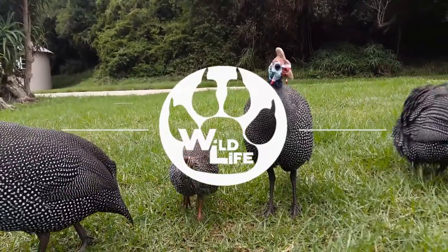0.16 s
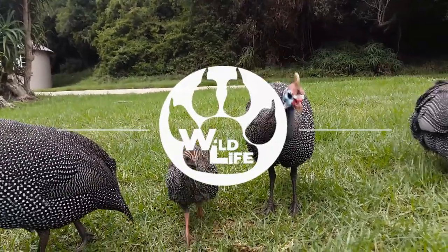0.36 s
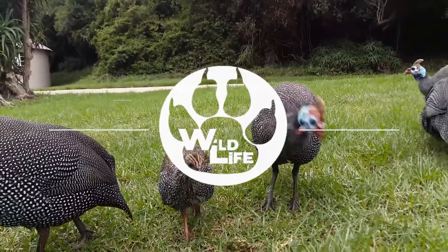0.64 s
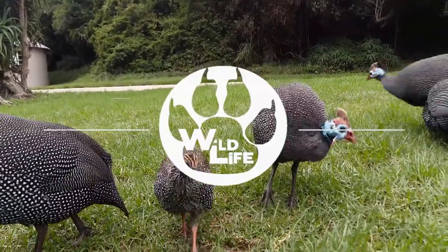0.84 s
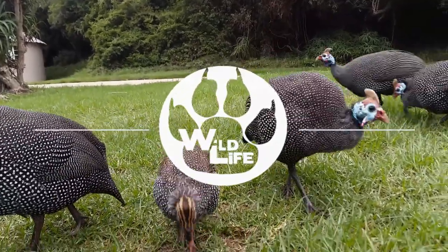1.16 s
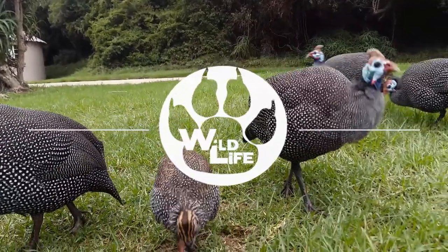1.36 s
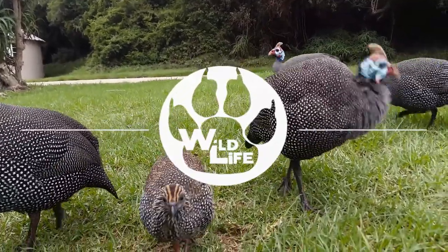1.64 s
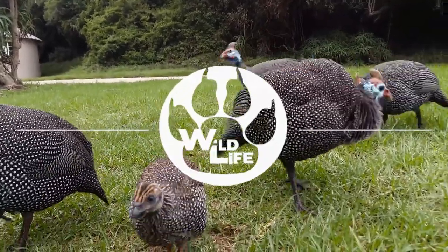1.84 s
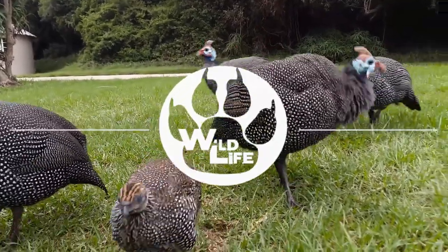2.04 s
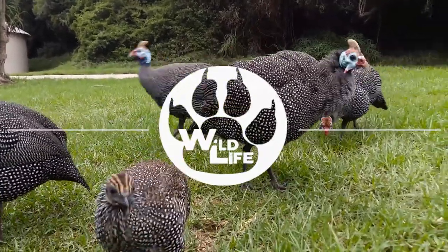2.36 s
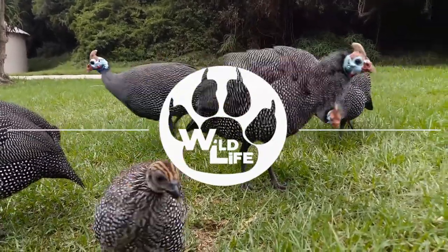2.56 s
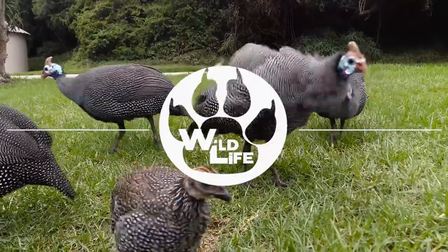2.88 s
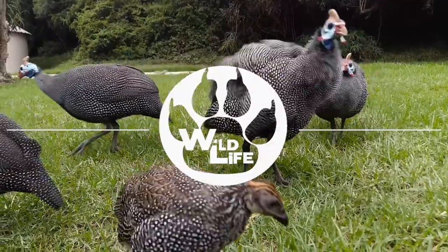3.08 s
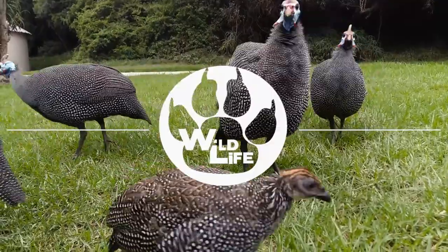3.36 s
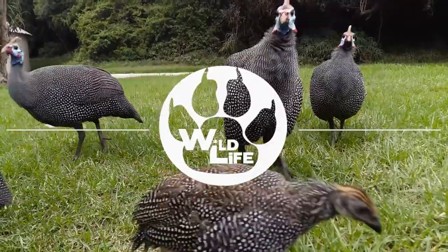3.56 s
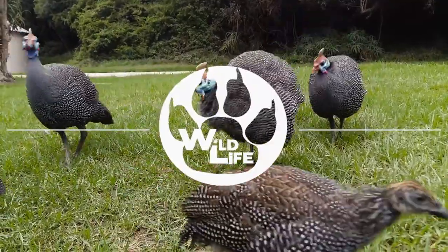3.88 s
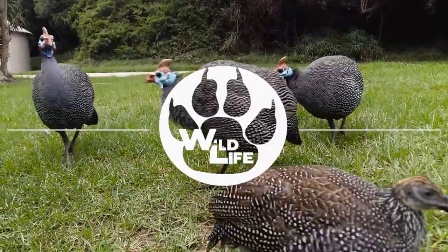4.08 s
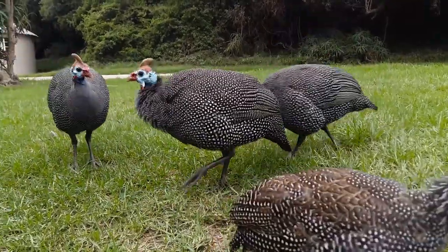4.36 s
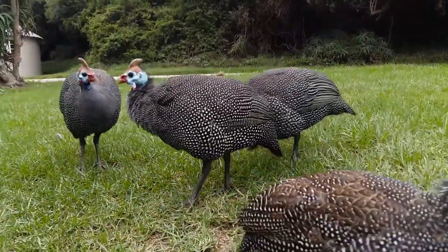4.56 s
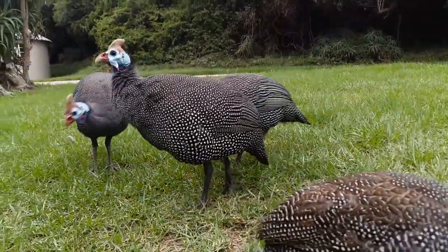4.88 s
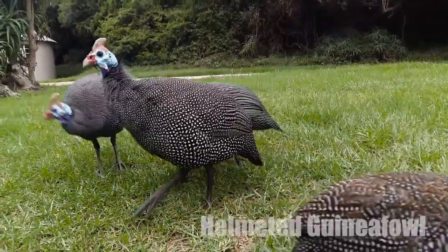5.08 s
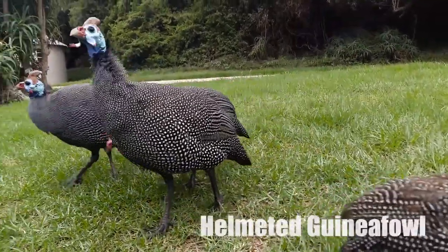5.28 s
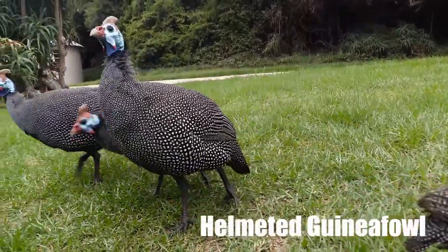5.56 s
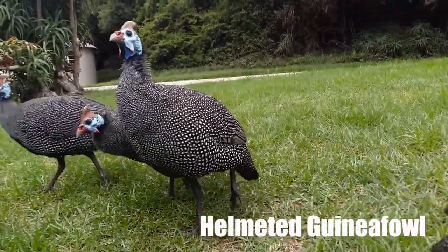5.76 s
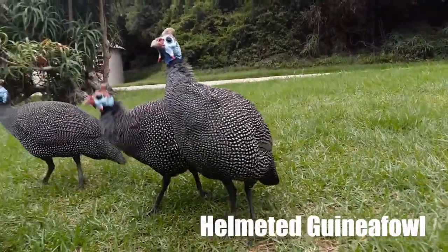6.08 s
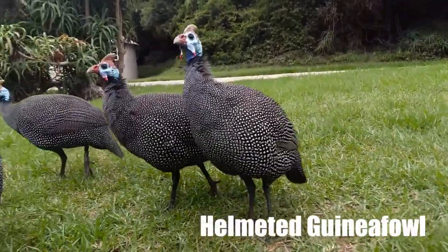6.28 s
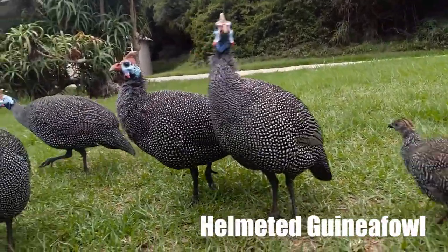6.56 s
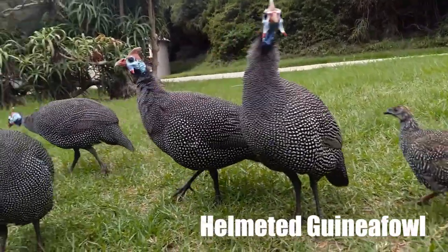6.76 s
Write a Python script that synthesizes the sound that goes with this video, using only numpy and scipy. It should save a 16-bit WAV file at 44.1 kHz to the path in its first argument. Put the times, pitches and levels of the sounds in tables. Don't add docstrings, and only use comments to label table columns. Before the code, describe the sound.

Low wind rumble and soft thumping buffets open the scene on a grassy lawn. Foraging guineafowl give brief chirps, falling whistles and thin chick warbles among grass snaps and dull footfalls. A bird shakes its feathers near three seconds, then a forced cry breaks into a sharp, very loud cluck at four. Sparser peeps, whistles and pecks follow. Close small stereo microphone, outdoors, faint echoes.

```python
import sys
import numpy as np
from scipy import signal
from scipy.io import wavfile
from scipy.ndimage import uniform_filter1d

SR = 44100
rng = np.random.default_rng(int(sys.argv[2]) if len(sys.argv) > 2 else 0)


def generate_wav(signal):
    frames = np.transpose(np.atleast_2d(signal))
    scaled = np.clip(frames, -1, 1) * 32767
    pcm = np.round(scaled).astype(np.int16)
    wavfile.write(sys.argv[1], SR, pcm)


def amplitude_ratio(level_db):
    exponent = np.asarray(level_db, float) / 20
    return 10 ** exponent


N = 305172


def evened(x):
    return x / np.sqrt(np.mean(x ** 2) + 1e-20)


def read(points, hz):
    f, *values = np.transpose(points)
    return np.array([np.interp(np.log(hz + 1), np.log(f + 1), v) for v in values])


def add(mix, s, sound):
    part = mix[..., max(round(s * SR), 0):][..., :sound.shape[-1]]
    part += sound[..., :part.shape[-1]]


def band(x, lo_hz, hi_hz, order=2):
    return signal.sosfilt(signal.butter(order, [lo_hz, hi_hz], "band", fs=SR, output="sos"), x)


def smooth(x, first, second):
    return uniform_filter1d(uniform_filter1d(x, first, mode="nearest"), second, mode="nearest")


# freq_hz, left_db, right_db
AIR = [(25.3, -77, -82), (45, -65.5, -66), (70, -67, -65), (141, -66, -65.5), (269, -71, -70.5),
       (590, -81.5, -80.5), (940, -84.5, -82.5), (1660, -87, -86), (2680, -91.5, -82.5), (3100, -92.5, -98),
       (4000, -96.5, -99.9), (4650, -97, -104.3), (5760, -101.4, -102.6), (14300, -109.2, -107.9)]
# freq_hz, left_db, right_db
RUSTLE = [(25, -68.3, -68.4), (45, -70.9, -71.0), (70, -64.3, -63.9), (130, -61.4, -60.2),
          (300, -68.7, -68.1), (600, -76.3, -74.6), (1000, -79.7, -77.6), (1700, -82.1, -75.2),
          (2500, -81.4, -69.1), (3200, -85.4, -84.3), (3800, -84.8, -92.1), (4700, -82.0, -98.3),
          (6000, -90.4, -94.4), (14000, -105.1, -104.1)]
# time_s, stir_db, wind_db
STIR = [(0.0, -82.5, -53.5), (0.56, -85.5, -52.5), (0.87, -83, -53), (1.73, -84.5, -55.5),
        (2.21, -79.5, -52), (2.511, -91.5, -56), (2.73, -75.5, -53), (2.89, -71, -47.5), (3.02, -74, -55),
        (3.085, -80.5, -54.5), (3.969, -80.5, -54), (4.59, -84.5, -54.5), (5.45, -77.5, -50.5),
        (5.95, -83, -53), (6.32, -78, -53.5), (6.43, -76, -52.5), (6.55, -79, -53.5), (6.92, -84, -50.5)]
# freq_hz, likeness (0-1)
LIKENESS = [(60, 0.77), (110, 0.66), (210, 1), (390, 0.45), (900, 0.19), (2500, 0.023)]


def lawn():
    frames, hz = N // 256 + 5, np.fft.rfftfreq(1024, 1 / SR)
    s, stir_db, wind_db = np.transpose(STIR)
    t = np.arange(frames) * 256 / SR
    a, b, c, d, patches = rng.standard_normal((frames, 513, 5)).T
    patches = evened(uniform_filter1d(uniform_filter1d(patches, 14, 0), 9, 1))
    lumps, flicker = (evened(uniform_filter1d(v, size=3, axis=1))[:, None]
                      for v in rng.standard_normal((frames, 2, 2)).T)
    low = 1 / (1 + (hz[:, None] / 450) ** 2)
    wind = low * (np.interp(t, s, wind_db) + 56 + 1.7 * lumps)
    air = amplitude_ratio(read(AIR, hz)[:, :, None] + wind)
    stir = np.sqrt(np.maximum(amplitude_ratio(2 * np.interp(t, s, stir_db + 72.5)) - .06, 0))
    treble_loss = 1 + (hz[:, None] / 9000) ** 2
    rustle = amplitude_ratio(read(RUSTLE, hz)[:, :, None] + 1.2 * flicker + patches)
    rustle = rustle * stir * (1 - low) / treble_loss
    same = np.clip(read(LIKENESS, hz)[0], -1, 1)[:, None]
    left = a + 1j * b
    right = same * left + np.sqrt(1 - same ** 2) * (c + 1j * d)
    z = np.array([left, right]) * np.hypot(air, rustle) * amplitude_ratio(7.0 + 1.37 * patches)
    return signal.istft(z, nperseg=1024, noverlap=768)[1][:, :N]


def whistle(arc, level_db, lead, octave, ports_db, strain=1):
    t = np.arange(len(arc)) / SR
    wander = rng.standard_normal(SR // 2)
    waver = evened(uniform_filter1d(uniform_filter1d(wander, size=100), size=60))[:len(t)]
    top_db = level_db.max()
    faint = np.clip((-40 - top_db) / 20, 0, 1.5)
    level = amplitude_ratio(level_db + ports_db + waver[::-1] * (.25 + 5 * faint))
    forced = np.clip(2 * (np.hypot(*level) / strain - 1), 0, 1)
    break_hz, span_hz = 3880, 199.6
    near = (arc - break_hz) / span_hz
    arc = arc + forced * span_hz * near * np.exp(-near ** 2 / 2)
    flutter = 1 - .9 * forced * np.exp(-(near / .35) ** 2)
    unsteady = 1 + (.0012 + .011 * faint) * waver
    turn = 2 * np.pi * np.cumsum(arc * unsteady) / SR + np.array([[lead], [0]])
    octave_db, share = octave
    octave_db = top_db + octave_db + share * (level_db - top_db) + 2.0 * waver + np.array([[0], [-9]])
    tone = level * np.sin(turn) * flutter + amplitude_ratio(octave_db) * np.sin(2 * turn)
    return np.sqrt(2) * tone * signal.windows.tukey(len(t), .08)


# freq_hz, left_db, right_db
PORTS = [(1600, -8.5, -5), (2350, -9, -1), (2700, -2.5, 3), (2950, 1.5, -2.5), (3250, -2.5, 0.5),
         (3700, 0, -13), (4400, 0.5, -24), (5100, -5.5, -20)]


def cavities(arc):
    return read(PORTS, arc)


# start_s, length_s, top_hz, end_hz, level_db
CHIRPS = [
    (0.047, 0.028, 2910, 2650, -57),
    (1.685, 0.032, 4360, 3800, -52.5),
    (5.045, 0.038, 4435, 3700, -43),
]


def chirps():
    out = np.zeros((2, N))
    attack_s, release_s, swell_s, swell_db = .0089, .005, 0.03, 12.6
    for start, length, top_hz, end_hz, db in CHIRPS:
        t = np.arange(0, length, 1 / SR)
        top = length - np.sqrt(abs(top_hz - end_hz) / 2.2) / 1000
        up, down = np.clip(1 - t / top, 0, 1), np.clip((t - top) / (length - top), 0, 1)
        arc = top_hz * (1 - 0.25 * up ** 2) - (top_hz - end_hz) * down ** 2.1
        edges = np.clip(t / attack_s, .03, 1) * np.clip((length - t) / release_s, .03, 1)
        swell = swell_db * np.clip((length - release_s - t) / swell_s, 0, 1)
        level_db = db - swell + 20 * np.log10(edges)
        add(out, start, whistle(arc, level_db, 1.4, (-44, .5), cavities(arc)))
    return out


# time_s, peak_db, pitch_hz, length_s
LEFT_BUFFETS = [(0.146, -35.7, 87, 0.021), (0.174, -29.3, 88, 0.017), (0.219, -36.8, 55, 0.013),
                (0.308, -33.8, 95, 0.011), (0.362, -28.3, 83, 0.027), (0.394, -33.6, 79, 0.014),
                (0.427, -36.2, 200, 0.008), (0.463, -33.6, 71, 0.008), (0.58, -29.1, 95, 0.017),
                (0.606, -34.8, 68, 0.01), (0.648, -34.1, 148, 0.008), (0.681, -22.8, 94, 0.011),
                (0.723, -37.1, 72, 0.017), (0.875, -33.1, 98, 0.016), (0.9, -35.6, 61, 0.008),
                (1.161, -36.0, 57, 0.008), (2.045, -37.8, 116, 0.011), (2.167, -37.0, 106, 0.012),
                (3.062, -33, 140, 0.007), (3.38, -37.3, 74, 0.008), (3.723, -30.1, 79, 0.02),
                (3.858, -37.5, 98, 0.008), (3.896, -27.5, 104, 0.021), (6.342, -37.3, 109, 0.012),
                (6.373, -35.0, 82, 0.018), (6.519, -34.3, 78, 0.033), (6.584, -37.8, 66, 0.008),
                (6.706, -28.7, 122, 0.008), (6.728, -35.9, 72, 0.008), (6.752, -28.4, 92, 0.018)]
# time_s, peak_db, pitch_hz, length_s
RIGHT_BUFFETS = [(0.446, -31.5, 256, 0.008), (0.472, -34.1, 98, 0.008), (3.061, -32, 150, 0.007),
                 (4.684, -37.7, 146, 0.011), (5.363, -33.3, 132, 0.01), (5.48, -33.1, 116, 0.01),
                 (5.57, -35.7, 146, 0.021), (5.695, -35.2, 154, 0.01), (5.745, -37.8, 68, 0.008),
                 (5.788, -37.1, 116, 0.008), (6.368, -37.3, 119, 0.011), (6.396, -36.8, 78, 0.008)]


def buffets():
    out = np.zeros((2, N))
    for port, rows in enumerate([LEFT_BUFFETS, RIGHT_BUFFETS]):
        for (s, db, hz, length), phase in zip(rows, rng.random(len(rows))):
            t = np.arange(-2 * length, 2 * length, 1 / SR)
            push = np.exp(-2.8 * (t / length) ** 2) * np.cos(2 * np.pi * (hz * t + phase))
            add(out[port], s - 2 * length, amplitude_ratio(db) * push)
    return out


def grown_call(rows, lead, octave):
    s, *curves = np.transpose(rows)
    t = np.arange(s[0], s[-1], 1 / SR)
    hz, db, pan_db = (np.interp(t, s, v) for v in curves)
    hz = uniform_filter1d(hz, 260, mode="nearest")
    db = uniform_filter1d(db, 90, mode="nearest")
    arched = hz.max() > 4500 and rows[0][1] < 2320
    db = db + 4 * arched * np.cos(2 * np.pi * (hz - 3500) * 0.00232)
    ports_db = 10 * np.log10(2 / (1 + amplitude_ratio(np.array([[-2], [2]]) * pan_db)))
    return whistle(hz, db, lead, octave, ports_db, strain=0.058)


# time_s, pitch_hz, level_db, left_over_right_db
PEEPS = [
    [(0.362, 2400, -62, -11), (0.368, 2410, -51, -15), (0.381, 2420, -44.1, -19), (0.399, 2370, -42, -15.5),
     (0.411, 2330, -44.3, -14), (0.421, 2260, -51, -13), (0.426, 2150, -62, -22)],
    [(2.427, 2770, -59, -12), (2.435, 2863, -48, -7), (2.465, 2883, -38.3, -8.5), (2.48, 2818, -34, -12),
     (2.501, 2645, -32.5, -15), (2.515, 2520, -39.3, -21), (2.522, 2500, -56, -23)],
    [(3.125, 2350, -57, -11), (3.129, 2340, -47, -14), (3.137, 2368, -40.5, -14),
     (3.156, 2350, -38.5, -14.5), (3.17, 2320, -43.5, -16), (3.178, 2250, -49, -16), (3.183, 2270, -61, -8)],
    [(5.393, 2180, -63, -13), (5.401, 2350, -41, -16), (5.41, 2390, -36.5, -16.5), (5.428, 2370, -37, -16),
     (5.444, 2300, -46.5, -17), (5.452, 2260, -55.5, -19), (5.454, 2160, -59.9, -21)],
    [(6.252, 2440, -50, -17), (6.26, 2626, -42.5, -13), (6.27, 2655, -36.7, -11), (6.284, 2525, -35, -19),
     (6.294, 2490, -39.5, -31), (6.305, 2406, -46, -20), (6.322, 2290, -62, -9)],
]
PEEP_OCTAVES_DB = [-29.5, -34.5, -25, -32.5, -37.5]


def peeps():
    out = np.zeros((2, N))
    left_leads_rad = [2, -1.0, 4.5, -2, 0.3]
    for rows, lead, octave_db in zip(PEEPS, left_leads_rad, PEEP_OCTAVES_DB):
        add(out, rows[0][0], grown_call(rows, lead, (octave_db, 0.83)))
    return out


# time_s, left_peak_db, right_peak_db, treble_db
SNAPS = [(0.413, -54, -40, -12), (1.1504, -49, -36.5, -13.5), (1.1524, -61, -32.5, -24),
         (1.662, -49.6, -49.5, -15), (1.856, -47, -42, -39), (2.717, -49, -53, -4),
         (2.802, -37, -48, -15.5), (2.8205, -38, -36, -12), (2.95, -50.5, -42, -8.5),
         (2.991, -46, -42.5, -14), (3.0577, -42.5, -35.5, -7.5), (3.063, -42, -50.5, 0),
         (4.832, -55, -55.5, -22.5), (4.956, -53.5, -43.5, -25.5), (5.58, -59, -46, -16),
         (5.637, -52, -37, -14), (5.6911, -65.5, -47, -18.0), (5.7299, -52, -58.5, -12),
         (5.977, -48, -35, -28), (5.986, -58, -38, -22.5), (6.437, -53, -50, -6),
         (6.537, -62.5, -28, -19.5), (6.705, -50.5, -41.5, -21.5), (6.732, -39, -29.5, -25.5),
         (6.747, -61, -35, -31), (6.751, -44, -49.5, -23), (6.773, -49.5, -39, -26)]


def snaps():
    out, t = np.zeros((2, N)), np.arange(900) / SR
    kick = -np.exp(-t / 0.00035) * np.sin(2 * np.pi * 1900 * t) * np.minimum(t / 0.00018, 1)
    for s, left_db, right_db, treble_db in SNAPS:
        noise = rng.standard_normal((3, len(t)))
        crackle = 0.15 * evened(band(noise[2], 350, 2300)) * np.exp(-t / 0.011)
        body = amplitude_ratio([[left_db], [right_db]]) * band(2.3 * kick + crackle, 250, 5000, order=1)
        tick = np.array([2.2 * band(noise[0], 4100, 5400), .3 * band(noise[1], 4000, 9000)])
        tick *= amplitude_ratio(max(left_db, right_db) + treble_db) * np.exp(-t / .003)
        dry_crack = band(1. * (t == 0), 5000, 15000, order=1)
        edge = amplitude_ratio([[left_db - 11.5], [right_db - 14.5]]) * dry_crack
        add(out, s, body + tick + edge)
    return out


# time_s, length_s, left_db, right_db, top_hz
STEPS = [
    (0.424, 0.024, -44.5, -40, 680),
    (1.148, 0.006, -38, -38, 750),
    (0.44, 0.022, -37.5, -38.5, 280),
    (5.9765, 0.0055, -40.5, -36.5, 690),
    (6.733, 0.016, -45, -42, 850),
]


def steps():
    out = np.zeros((2, N))
    for s, length, left_db, right_db, top_hz in STEPS:
        t = np.arange(0, 4 * length, 1 / SR)
        crunch = evened(band(rng.standard_normal(len(t)), 120, top_hz))
        fade = (1 - np.exp(-t / 0.0016)) * np.exp(-t / length)
        add(out, s, amplitude_ratio([[left_db], [right_db]]) * crunch * fade)
    return out


# centre_s, length_s, centre_hz, left_db, right_db
RASPS = [
    (4.047, 0.032, 5760, -52.5, -67.5),
    (2.133, .016, 2600, -63, -53),
    (3.37, 0.083, 4500, -62, -80),
    (0.432, .05, 1640, -66, -57.5),
    (4.1, 0.1, 3470, -67, -72),
    (4.392, 0.026, 3800, -69.5, -77),
    (2.142, .04, 4100, -63, -69),
    (4.943, .025, 3400, -60, -65),
]


def rasps():
    out = np.zeros((2, N))
    for s, length, hz, *db in RASPS:
        puff = evened(band(rng.standard_normal((2, 5000)), 0.89 * hz, 1.05 * hz))
        puff = puff[:, 500:500 + round(length * SR)]
        add(out, s - length / 2, amplitude_ratio(db)[:, None] * puff * np.hanning(puff.shape[1]) * 1.9)
    return out


def thin_line(rows):
    s, hz, db = np.transpose(rows)
    t = np.arange(s[0], s[-1], 1 / SR)
    arc = smooth(np.interp(t, s, hz), 300, 200)
    return whistle(arc, np.interp(t, s, db), 2.0, (-60, 1), cavities(arc))


# time_s, pitch_hz, level_db
WARBLES = [
    [(.486, 3100, -74), (.5, 3480, -52), (.512, 3750, -52.5), (.518, 3700, -58), (.526, 3050, -64)],
    [(.645, 1260, -62), (.652, 1260, -53), (.661, 600, -58)],
    [(.68, 4000, -70), (.686, 3010, -70), (.696, 2540, -61.5), (.722, 1820, -52.5), (.735, 1690, -58)],
    [(5.928, 4650, -58), (5.935, 4850, -50.5), (5.94, 4400, -55.5), (5.947, 4130, -41),
     (5.954, 4000, -58.5)],
    [(2.543, 3760, -67), (2.555, 3710, -51), (2.57, 4550, -60.5), (2.585, 5600, -66.5),
     (2.592, 5650, -74.5)],
    [(3.095, 2700, -62), (3.125, 3420, -58), (3.15, 3550, -70), (3.2, 3800, -72), (3.24, 4100, -66),
     (3.305, 4160, -63), (3.32, 4180, -72)],
    [(3.372, 2700, -57), (3.397, 3770, -51), (3.408, 4350, -63), (3.435, 3850, -52.5), (3.47, 3250, -61),
     (3.498, 3150, -50.5), (3.51, 3800, -68), (3.53, 4100, -76)],
    [(3.52, 2600, -64), (3.55, 3610, -74), (3.6, 4030, -72), (3.67, 4590, -74.5), (3.686, 4400, -80),
     (3.7, 3700, -76), (3.724, 3530, -66.5), (3.81, 3510, -81)],
]


def warbles():
    out = np.zeros((2, N))
    for rows in WARBLES:
        add(out, rows[0][0], thin_line(rows))
    return out


# time_s, pitch_hz, level_db
HUMS = [
    [(.815, 3000, -77), (.845, 2950, -76), (.885, 2850, -79)],
    [(3.27, 2030, -58.5), (3.33, 1970, -61), (3.4, 2036, -56)],
    [(3.425, 1680, -58), (3.44, 1660, -48), (3.468, 1550, -45), (3.488, 1520, -41.5), (3.505, 1505, -60)],
]


def hums():
    out = np.zeros((2, N))
    for rows in HUMS:
        add(out, rows[0][0], thin_line(rows))
    return out


# time_s, pitch_hz, level_db, left_over_right_db
SLIDES = [
    [(0.892, 3460, -72.6, 3), (0.897, 3510, -57.5, 4), (0.914, 3630, -50.5, 6), (0.932, 3486, -45.5, 3),
     (0.962, 2990, -41, -9), (0.977, 2850, -44.5, -7), (0.993, 2650, -53, -9.5), (0.999, 2450, -63, -15),
     (1.001, 2620, -71, -10)],
    [(3.321, 3630, -64, 12), (3.327, 3810, -52, 10), (3.345, 3810, -46.1, 12), (3.362, 3670, -47, 10),
     (3.375, 3400, -53, 2), (3.398, 2990, -38.5, -6), (3.417, 2790, -37.5, -15.5), (3.423, 2760, -48, -14),
     (3.426, 2600, -58, -18)],
    [(4.507, 3260, -68, 4), (4.511, 3270, -56, 4), (4.527, 3465, -48.5, 7), (4.546, 3366, -47.5, 5),
     (4.58, 2830, -41.5, -4), (4.593, 2730, -39, -7), (4.601, 2680, -40, -9), (4.607, 2626, -46.5, -20),
     (4.612, 2590, -66, -19)],
    [(5.562, 3645, -68.6, 10), (5.57, 3710, -50, 10), (5.584, 3800, -47.5, 9), (5.607, 3535, -44.5, 8),
     (5.625, 3250, -60, -6.5), (5.632, 3106, -51.5, 8), (5.654, 2834, -43.5, -12), (5.669, 2645, -48, -13),
     (5.675, 2630, -67.2, -9)],
]


def slides():
    out = np.zeros((2, N))
    for rows, left_lead_rad in zip(SLIDES, [-1.3, 3.5, -0.3, -1.2]):
        add(out, rows[0][0], grown_call(rows, left_lead_rad, (-31.5, 0.62)))
    return out


# multiple_of_pitch, left_db, right_db
BEAK = [(.235, -27.5, -25.5), (1, -3.5, 1.5), (1.255, -19.5, -13), (1.52, -32.5, -20), (1.729, -17.5, -5.5),
        (2.01, -8.5, -7), (2.6, -31, -47), (3.0, -19.5, -44.5), (3.7, -35, -54), (4.4, -45.5, -65),
        (5.1, -40, -58), (5.7, -52, -64)]


def cluck(hz, half, level_db, rattle):
    t = np.arange(-3 * half, 5 * half, 1 / SR)
    lead = np.array([[np.pi * (.9 - rattle)], [0]])
    sagging = t * (1 - 14 * rattle * t)
    modes = 0
    for (k, *db), slip in zip(BEAK, rng.random(len(BEAK))):
        chop = 1 + (k == 1) * rattle * np.cos(2 * np.pi * 410 * t)
        soft_db = (k != 1) * (.4 - rattle) * (25 if 2 < k < 3 else 42)
        brief = np.exp(-((k - 1) * t / (2 * half)) ** 2)
        tone = np.cos(2 * np.pi * (k * hz * sagging + .05 * slip - .22 * (k != 1)) + lead)
        modes = modes + amplitude_ratio(np.array(db)[:, None] - soft_db) * brief * chop * tone
    grit = 1 + .12 * rattle * evened(band(rng.standard_normal((2, 3000)), 150, 600))[:, :len(t)]
    bell = np.exp(-(t / half / np.where(t > 0, .85, 1)) ** 2)
    ring = 0.2 * np.exp(-abs(t) / half) * np.clip(t / half, 0, 1)
    return amplitude_ratio(level_db) * (bell + ring) * grit * modes


# centre_s, pitch_hz, half_length_s, level_db, rattle (0-1)
CLUCKS = [
    (1.716, 1600, .0025, -47, 0.21),
    (2.13, 1747, 0.0038, -48.5, 0.48),
    (2.822, 1220, .003, -41, 0.35),
    (4.0708, 1664, 0.0037, -11, 0.39),
    (5.082, 2300, .0025, -46, .1),
    (5.09, 2310, .003, -46.5, 0),
    (2.16, 1790, 0.0047, -55.5, 0.05),
    (5.9607, 1660, 0.0036, -29, 0.11),
]


def clucks():
    out = np.zeros((2, N))
    for s, hz, half, level_db, rattle in CLUCKS:
        add(out, s - 3 * half, cluck(hz, half, level_db, rattle))
    return out


# time_s, pitch_hz, level_db, left_over_right_db
CRIES = [
    [(2.067, 2080, -56, -11), (2.071, 2426, -50, -12), (2.083, 3990, -64.5, 15), (2.096, 4760, -53, 16),
     (2.106, 5080, -60, 7), (2.114, 4710, -44.0, 21), (2.121, 3890, -42, 12), (2.126, 3490, -33, 14),
     (2.128, 3680, -50, 17)],
    [(4.01, 2355, -55, -8), (4.012, 2527, -48.5, -13), (4.021, 3864, -53, 13), (4.03, 4620, -39, 32),
     (4.04, 4980, -42, 21), (4.05, 4510, -28.5, 28), (4.058, 4160, -24.5, 33), (4.0625, 3660, -21, 7),
     (4.0675, 3300, -30, 6)],
    [(4.861, 2050, -64, -10), (4.865, 2540, -48.5, -17), (4.88, 3900, -60, 18), (4.889, 4500, -55, 24),
     (4.902, 5100, -64, 28), (4.917, 4270, -44, 26), (4.918, 4380, -45.3, 27), (4.926, 3060, -35.5, -1),
     (4.93, 3100, -55, -3)],
]


def cries():
    out = np.zeros((2, N))
    for rows, left_lead_rad in zip(CRIES, [-.4, -0.8, -.4]):
        add(out, rows[0][0], grown_call(rows, left_lead_rad, (-40.5, 0.57)))
    return out


# centre_s, half_length_s, level_db
BRUSHES = [(2.271, .012, -62), (2.295, 0.014, -57), (2.318, .015, -57.5), (2.697, 0.007, -58),
           (2.763, .008, -57.5), (2.832, 0.0074, -52), (2.877, .008, -59), (2.65, 0.0079, -67),
           (2.668, 0.0084, -64.5), (2.72, 0.022, -58), (2.745, .008, -55.5), (2.784, 0.011, -53.5),
           (2.811, 0.011, -44), (2.851, 0.01, -58.5), (2.895, 0.023, -54), (2.919, .012, -52.5),
           (2.952, 0.013, -53), (2.992, .016, -50.5), (3.022, 0.017, -59), (6.382, 0.018, -57),
           (6.4, .015, -55), (6.431, .025, -53), (6.449, .015, -57)]


def feathers():
    out = np.zeros((2, N))
    for s, length, db in BRUSHES:
        noise = rng.standard_normal((3, 2500))
        wide = evened(band(noise[2], 800, 4900, order=1))
        left = 0.32 * evened(band(noise[0], 4200, 5100)) + 0.16 * wide
        right = evened(band(noise[1], 2400, 2760)) + 0.15 * wide
        catch = amplitude_ratio(2 * evened(uniform_filter1d(noise[0], size=60)))
        puff = (np.array([left, right]) * catch)[:, 500:500 + round(2 * length * SR)]
        add(out, s - length, amplitude_ratio(db) * puff * np.hanning(puff.shape[1]) ** 2)
    return out


# delay_s, left_db, right_db
ECHOES = [
    (.018, -45, -43),
    (.051, -47, -47),
    (.317, -59, -58),
]


def surroundings(calls):
    t = np.arange(SR // 2) / SR
    fade = amplitude_ratio(-60 * t / .14) + .1 * amplitude_ratio(-60 * t / .6)
    tail = rng.standard_normal((2, len(t))) * fade * (t > .003)
    space = amplitude_ratio([[-26], [-28]]) * band(tail, 3560, 5500) / np.linalg.norm(tail[0]) * 2
    i = np.arange(900)
    for delay, *db in ECHOES:
        leaves = rng.standard_normal((2, 900)) * np.exp(-i / 250) * np.hanning(900) ** .3
        blur = band(leaves, 1450, 2300, order=4)
        add(space, delay - .004, amplitude_ratio(db)[:, None] * blur / np.linalg.norm(blur[0]))
    return signal.fftconvolve(calls, space, axes=1)[:, :N]


def scene():
    calls = chirps() + peeps() + warbles() + hums() + slides() + clucks() + cries()
    flock = calls + surroundings(calls)
    return lawn() + flock + buffets() + snaps() + steps() + rasps() + feathers()


def roll_off(x):
    return signal.sosfilt(signal.butter(12, 15450, fs=SR, output="sos"), x)


def record(dry):
    cut = signal.sosfilt(signal.butter(5, 46, "high", fs=SR, output="sos"), dry)
    return roll_off(cut)


dry = scene()
out = record(dry)
generate_wav(out)
```